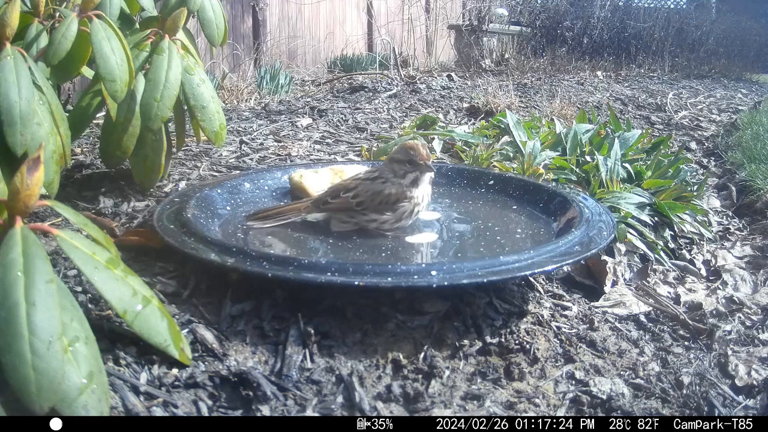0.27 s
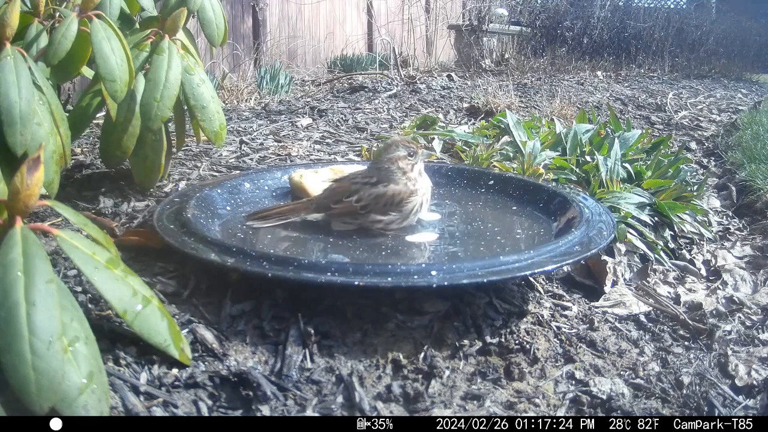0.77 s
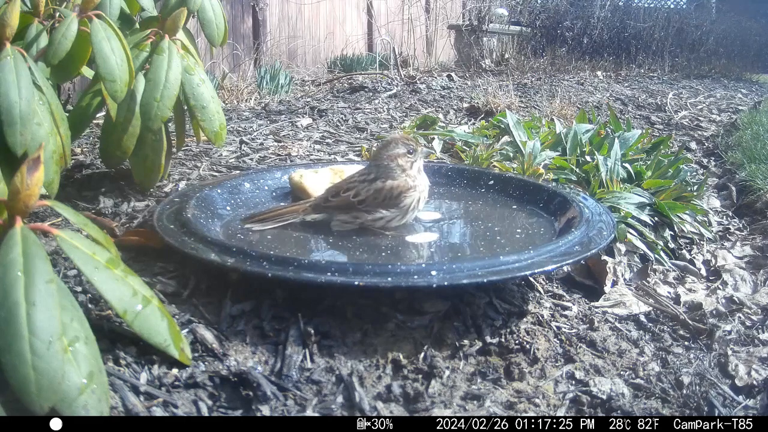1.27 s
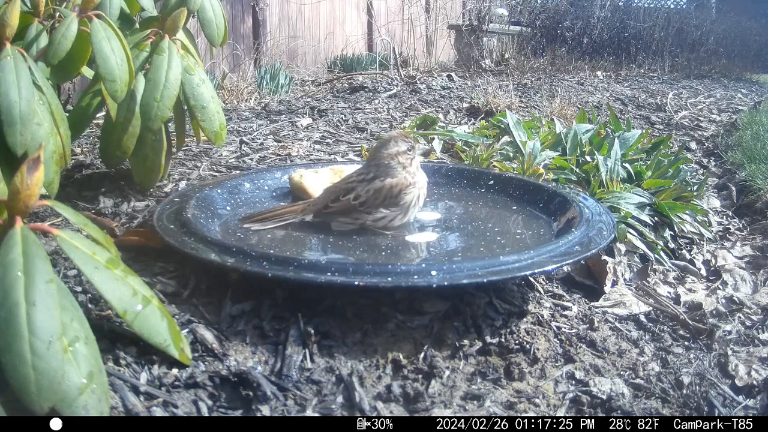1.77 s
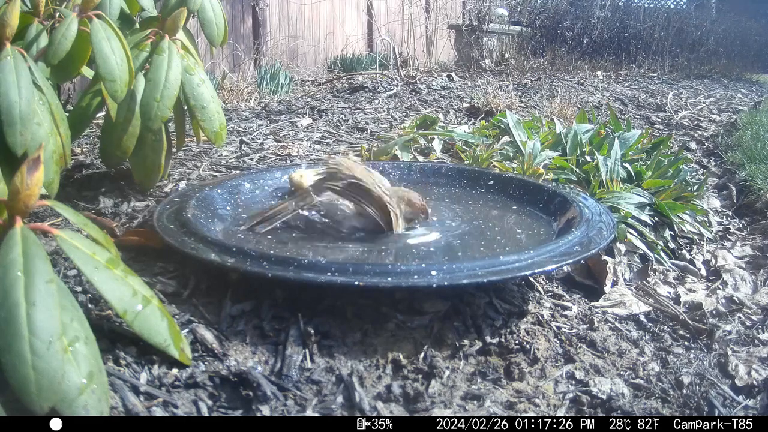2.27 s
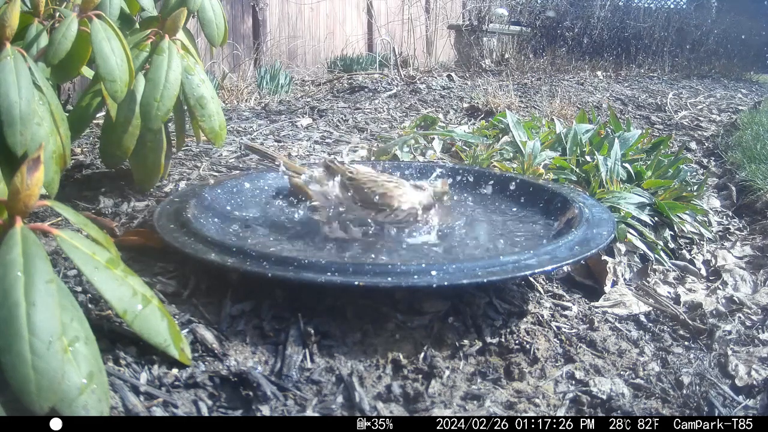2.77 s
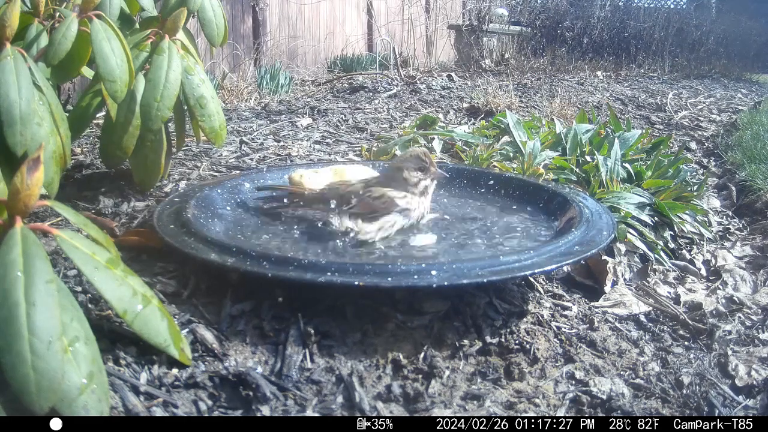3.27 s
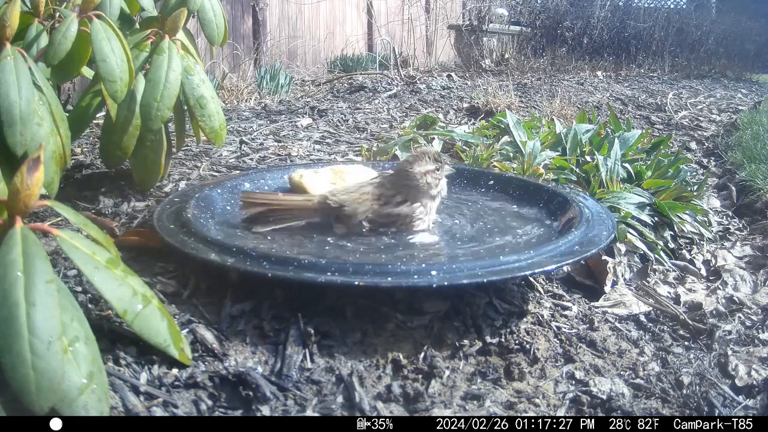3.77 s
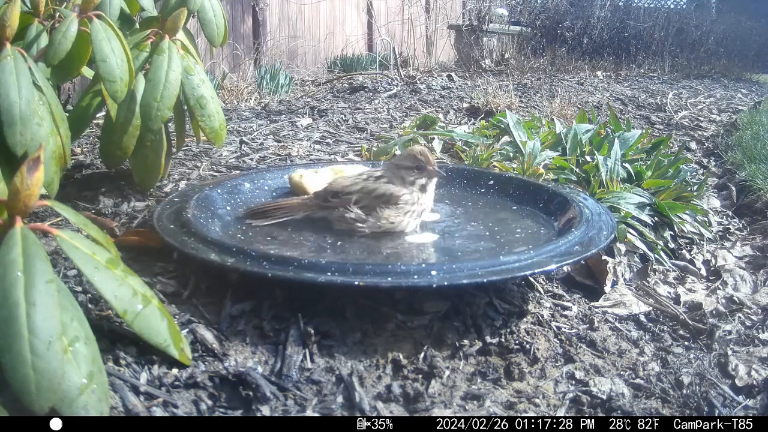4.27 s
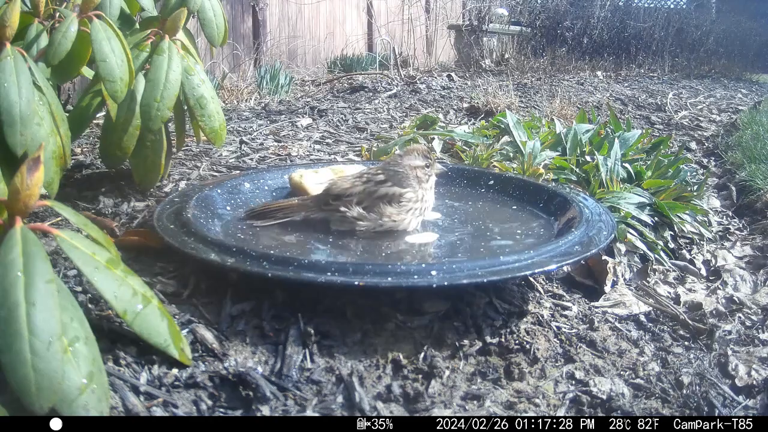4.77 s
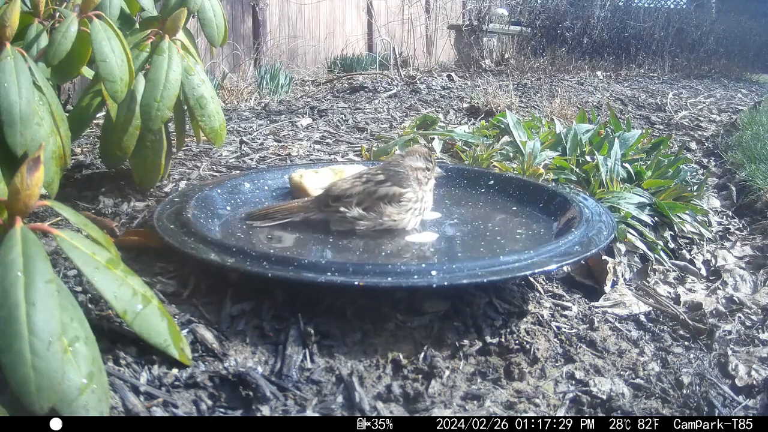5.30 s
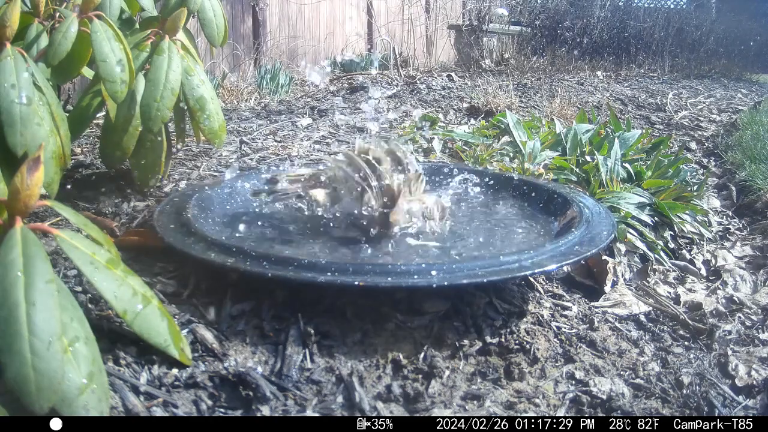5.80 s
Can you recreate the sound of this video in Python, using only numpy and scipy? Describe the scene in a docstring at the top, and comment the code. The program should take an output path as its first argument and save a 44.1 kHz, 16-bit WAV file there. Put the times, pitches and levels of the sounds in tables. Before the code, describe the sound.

A faint, distant low rumble and steady microphone hiss run throughout in a quiet backyard. At about 1.4 seconds a small bird gives one short, nasal, slightly raspy chirp close by. From 2.4 seconds it bathes in a shallow dish, wet wings whirring through the water in quick bouts. Flung drops patter down, a few knock on the microphone's plastic case around 2.6 seconds, and tiny bubbles plink. Between 3 and 4 seconds the splashing brings sharp little slaps and a soft flutter of air, with a second chirp at about 3.8 seconds. The water settles by 4.2 seconds. The lull holds very soft, dull far-off puffs and one thin, faint whistle from a distant bird near 4.7 seconds. At 5.7 seconds a last burst of splashing starts, with more drops knocking on plastic and a bright bubble plink at about 6 seconds.

```python
"""A sparrow bathes in a shallow backyard dish, its wet wings whirring through the water in short bouts.
Wing tips and drops slap the surface, trapped bubbles ring, and flung drops patter about and knock on
the plastic case of a small camera on the ground. Two nasal chirps sound close by, and a far bird
whistles one thin call with both sides of its syrinx. Underneath lies a bed of distant rumble,
soft far-off puffs and microphone hiss."""
import sys
import numpy as np
from scipy import signal
from scipy.fft import rfft, irfft
from scipy.io import wavfile
from scipy.ndimage import uniform_filter1d

SR = 44100
rng = np.random.default_rng(int(sys.argv[2]) if len(sys.argv) > 2 else 0)


def wrap_up_sound(samples):
    """Save the sound to the file named by the first command line argument, as 16-bit audio."""
    columns = np.atleast_2d(samples).T
    # keep every value between -1 and 1, then stretch to whole-number steps
    tamed = np.clip(columns, -1, 1)
    steps = np.round(tamed * 32767).astype(np.int16)
    wavfile.write(sys.argv[1], SR, steps)


N = 266452
TIME = np.arange(N) / SR


def amp(db):
    """Decibels to gain."""
    return 10 ** (np.asarray(db) / 20)


def unit(x):
    """Normalises to rms 1."""
    return x / np.sqrt(np.mean(x ** 2) + 1e-20)


def eq_gain(curve, hz):
    """Gain of an EQ curve at hz, read on a log-frequency axis."""
    f, db = np.transpose(curve)
    return amp(np.interp(np.log(hz + 1), np.log(f), db))


def follow(curve, t):
    """Value of an automation curve at the times t."""
    return np.interp(t, *np.transpose(curve))


def add(mix, s, sound):
    """Mixes a sound in at time s."""
    part = mix[max(round(s * SR), 0):][:len(sound)]
    part += sound[:len(part)]


def colour(x, curve, size=2048):
    """Minimum-phase EQ, its impulse response scaled to energy 1."""
    log_gain = np.log(eq_gain(curve, abs(np.fft.fftfreq(size, 1 / SR))))
    taps = np.fft.ifft(np.exp(np.conj(signal.hilbert(log_gain)))).real
    return signal.oaconvolve(x, taps / np.linalg.norm(taps))[:len(x)]


def noise(curve):
    """Steady noise shaped by an EQ curve, rms 1."""
    spectrum = rfft(rng.standard_normal(N)) * eq_gain(curve, np.fft.rfftfreq(N, 1 / SR))
    return unit(irfft(spectrum, N))


def split(x, hz, order=2):
    """Crossover: the bands below and above hz."""
    low = signal.sosfiltfilt(signal.butter(order, hz, fs=SR, output="sos"), x)
    return low, x - low


def patter(per_s, spread_db):
    """Random clicks, many small and a few large, rms 1."""
    size = amp(spread_db * np.minimum(rng.exponential(1, N), np.pi)) * rng.choice([-1, 1], N)
    return unit(size * (rng.random(N) < per_s / SR))


def wobble(size):
    """Smoothed random modulation, rms 1."""
    return unit(uniform_filter1d(rng.standard_normal(size), size=60))


# EQ of the distant rumble: f/Hz, gain/dB
RUMBLE_EQ = [(15, -12), (55, -8.5), (75, -1), (92, 2.5), (118, -8), (155, -6), (240, -12.5), (320, -17.5),
             (500, -28), (900, -35), (5000, -67)]
# fader ride on its deep drone: t/s, level/dB
DRONE_RIDE = [(0.07, -54.5), (0.6, -56), (0.65, -49.5), (1.88, -55), (1.96, -49), (2.46, -58.5),
              (2.51, -52), (5.59, -54), (6.04, -52.5)]

def rumble(roar_db=-57.0):
    """Distant low rumble: a deep drone swells under a steady, softer roar."""
    drone, roar = split(noise(RUMBLE_EQ), hz=124.0, order=6)
    power = uniform_filter1d(unit(drone) ** 2, size=5000)
    compressed = unit(drone / power ** .4)
    return amp(follow(DRONE_RIDE, TIME)) * compressed + amp(roar_db) * unit(roar)


# EQ of the microphone's noise floor: f/Hz, gain/dB
HISS_EQ = [(1600, 1), (3000, -0.5), (5000, -1.5), (9500, 0), (11000, -2.5), (15000, -2), (16000, -17)]

def hiss(db=-66.0):
    """The microphone's own steady, nearly white noise."""
    return amp(db) * noise(HISS_EQ)


# resonances of the near bird's throat: f/Hz, gain/dB
THROAT_EQ = [(900, -14), (1850, 1), (2700, -3.5), (3600, 7.5), (4000, -5.5), (4600, -19), (7000, -10.5),
             (8000, -33)]
# chirp cues: t/s, length/s, top pitch/Hz, level/dB, roughness/0-1
CHIRP_CUES = [(1.429, .062, 1886, -41.5, 0.83), (3.847, .052, 1920, -39.5, .6)]

def chirp(length, top_hz, db, roughness, rise_s=.031, arch_s=.051, scoop_s=.00817, bright_s=.045):
    """A nasal note scoops up into an arch of pitch and level, breaking into a rasp near the top."""
    t = np.arange(0, length, 1 / SR)
    droop = ((t - rise_s) / arch_s) ** 2  # 0 at the top of the arch, 1 where the pitch would halve
    scoop = np.exp(-(t / scoop_s) ** 2)  # the attack starts flat and weak
    rough = roughness * np.exp(-((t - .033) / .016) ** 2)  # the voice breaks up around 33 ms
    hz = top_hz * (1 - .182 * scoop + .031 * rough * wobble(len(t))) / (1 + droop)
    cycles, voice = np.cumsum(hz) / SR, np.zeros(len(t))
    rasp = .45 * rough
    for k in np.arange(1, 11) / 2:  # five harmonics, with rough half-order partials between
        a, b = (unit(uniform_filter1d(wobble(len(t)), size=45)) for _ in range(2))
        flutter = (1 + rasp * (a + 1j * b)) / np.hypot(1, rasp)  # shakes level and phase
        gain = eq_gain(THROAT_EQ, k * hz) * (amp(-1) * rough if k % 1 else 1)
        if k * top_hz > 4200:  # the top overtones die away as the note goes on
            gain *= np.exp(-t / bright_s)
        voice += gain * (flutter * np.exp(2j * np.pi * k * cycles)).real
    return amp(db - 37 * droop - 6 * scoop) * unit(voice) * signal.windows.tukey(len(t), .1)


# far-off puff cues: t/s, level/dB
PUFF_CUES = [(1.52, -67.5), (2.0, -68), (4.3, -64), (4.76, -63.5), (5.23, -66)]
# dull tone of a puff: f/Hz, gain/dB
PUFF_EQ = [(80, -4), (250, 3), (700, 0), (1400, -7.5), (4000, -31)]

def puffs(half_length_s=0.036):
    """Soft, dull puffs, blurred by distance."""
    envelope = sum(amp(db) / np.hypot(1, ((TIME - s) / half_length_s) ** 2) for s, db in PUFF_CUES)
    return noise(PUFF_EQ) * envelope


# tone of splashing water: f/Hz, gain/dB
SPLASH_EQ = [(120, -13), (300, 1.5), (700, 3.5), (1300, 3.5), (2100, -7), (3700, -2.5), (4300, -12.5),
             (10000, -9), (13000, -9), (16000, -21.5)]
# bouts of wing beats, slower and longer-stroked when the bird lies deep in the water:
# first stroke/s, last stroke/s, rough beat rate/Hz, level/dB, mid-bout offset/dB,
# stroke half length/s, falling drops/dB, fanned air/dB
WING_BOUTS = [(2.403, 2.466, 15, -58, 0, .0056, -66.5, -74), (2.538, 2.8, 19, -55, 7.5, 0.0062, -63, -71),
              (2.86, 2.954, 12, -61.5, 0, 0.0073, -67, -68),
              (3.048, 3.318, 22, -51.5, -1.5, 0.0036, -66.5, -59),
              (3.606, 3.915, 22, -51.5, 3.5, 0.0035, -64, -55),
              (5.72, 5.993, 19, -53, 1, 0.0055, -59.5, -52.5)]

def wings(long_stroke_s=0.0054):
    """Wet feathers tear the water into tiny clicks; longer strokes throw more fine spray."""
    body, spray = split(colour(patter(per_s=9000, spread_db=5), SPLASH_EQ), hz=4030)
    out = np.zeros(N)
    for first, last, rate, db, mid_db, half_length, _, _ in WING_BOUTS:
        water = body + half_length / long_stroke_s * spray
        for progress in np.linspace(0, 1, round((last - first) * rate) + 1):
            s = first + progress * (last - first)
            gain = amp(db + mid_db * np.sin(np.pi * progress) ** 2)
            stroke = abs(TIME - s) < 6 * half_length
            out[stroke] += gain * water[stroke] / np.cosh((TIME[stroke] - s) / half_length)
    return out


def bout_envelope(first, last, attack_s=0.094, release_s=0.16):
    """Builds up before a bout, holds while the wings beat, then dies away."""
    return np.exp(-np.maximum(first - TIME, 0) / attack_s - np.maximum(TIME - last, 0) / release_s)


def draught(band_hz=(115, 220)):
    """The beating wings fan a soft, low flutter of air."""
    bandpass = signal.butter(2, band_hz, "band", fs=SR, output="sos")
    air = unit(signal.sosfilt(bandpass, rng.standard_normal(N)))
    envelopes = [amp(db) * bout_envelope(first, last) for first, last, *_, db in WING_BOUTS]
    return air * np.max(envelopes, axis=0)


# tone of fine spray landing: f/Hz, gain/dB
SPRAY_EQ = [(300, -12), (800, 9), (3500, -2), (4600, -7), (13000, -13), (16000, -10)]

def drizzle(pitches=24, ring_cycles=6):
    """Fine drops fall back around each bout: dry ticks and tiny pitched plinks."""
    t, plinks = np.arange(512) / SR, np.zeros(N)
    for hz in np.geomspace(2500, 13000, pitches) * rng.uniform(0.936, 1.05, pitches):
        plink = np.exp(-t * hz / ring_cycles) * np.sin(2 * np.pi * hz * t)
        plinks += unit(signal.oaconvolve(patter(per_s=10, spread_db=6.0), plink)[:N])
    ticks = colour(patter(per_s=1400, spread_db=5.5), SPRAY_EQ)
    envelopes = [amp(db) * bout_envelope(first, last) for first, last, *_, db, _ in WING_BOUTS]
    return np.max(envelopes, axis=0) * (0.62 * ticks + 0.48 * unit(plinks))


# drops hitting the camera's case: t/s, ring/dB, splat/dB
KNOCK_CUES = [(2.554, -46.5, -50), (2.6153, -45.5, -48.5), (2.67, -37, -41.5), (2.789, -67, -49.5),
              (5.6906, -52, -52), (5.799, -52, -46.5), (5.857, -40, -44.5), (5.97, -54, -54)]
# modes of the plastic case: f/Hz, relative level/dB, t60/s
CASE_MODES = [(653, -3.5, 0.12), (925, -3.5, 0.11), (1157, -5.5, 0.093), (1263, -4.5, 0.11),
              (1440, -7.5, 0.13), (1540, -4.5, 0.12), (1724, -6, .08), (2140, -11, 0.076),
              (3060, -28, 0.043), (3280, -9.5, 0.053), (3580, -23, 0.03), (5470, -13, 0.06)]
# tone of a drop bursting on plastic: f/Hz, gain/dB
SPLAT_EQ = [(300, -20), (700, 1.5), (1600, -2), (2400, 3), (3400, 0), (4400, -2.5), (5600, 1), (7500, -8),
            (16000, -54)]

def knocks(splat_s=0.0081, size=8192):
    """A drop bursts on the case and rings its modes, with fresh phases on every hit."""
    out, t = np.zeros(N), np.arange(size) / SR
    hz, mode_db, t60 = np.transpose(CASE_MODES)[:, :, None]
    weight = amp(mode_db)
    decays = weight * np.exp(-np.log(1000) * t / t60) / np.sqrt((weight ** 2).sum() / 2)
    for s, ring_db, splat_db in KNOCK_CUES:
        ring = (decays * np.sin(2 * np.pi * (hz * t + rng.random(hz.shape)))).sum(0)
        splat = colour(rng.choice([-1, 1], size) * np.exp(-t / splat_s), SPLAT_EQ)
        add(out, s, amp(ring_db) * ring + amp(splat_db) * splat)
    return out


# the larger bubbles left by drops: t/s, peak level/dB, f/Hz
BUBBLE_CUES = [(2.735, -45.5, 5080), (2.769, -52, 4400), (2.790, -41, 3210), (5.985, -45.5, 2430),
               (6.0156, -31, 2450)]

def bubbles(life_cycles=9):
    """A trapped bubble rings for a few milliseconds and bursts; small, high ones go sooner."""
    out, t = np.zeros(N), np.arange(2048) / SR
    for s, db, hz in BUBBLE_CUES:
        add(out, s, amp(db) * np.exp(-(t * hz / life_cycles) ** 3) * np.sin(2 * np.pi * hz * t))
    return out


# hard hits of a wing tip or drop on the water: t/s, crack/dB, swish/dB, treble shelf on both/dB
SLAP_CUES = [(3.0924, -33, -46, -4), (3.0997, -33, -44, 1), (3.141, -33.5, -42, -1.5),
             (3.1854, -31.5, -57, -4.5), (3.228, -40, -41.5, 3), (3.323, -40, -40, 1.5),
             (3.3757, -38, -51, -0.5), (3.604, -45, -42, -17), (3.6934, -41, -62, 0),
             (3.9203, -35.5, -41.5, -5.5), (3.9726, -44, -47.5, 8.5), (4.1886, -40, -56.5, 8.5),
             (5.7798, -40.5, -48, 4)]

def slaps(fizz_s=0.00048, swish_s=0.0013, lead_s=0.00096):
    """A brief swish of water leads into a crack: one sharp push with a very short tail of fizz."""
    out, t = np.zeros(N), np.arange(-1024, 1024) / SR
    for s, crack_db, swish_db, treble_db in SLAP_CUES:
        fizz = 0.98 * rng.standard_normal(len(t)) * np.exp(-abs(t) / fizz_s) * (t >= 0)
        crack = colour((t == 0) + fizz, SPLASH_EQ)
        body, mist = split(colour(rng.standard_normal(len(t)), SPLASH_EQ), hz=4400)
        swish = (body + 0.19 * mist) / np.cosh((t + lead_s) / swish_s)
        slap = amp(crack_db) * crack / abs(crack).max() + amp(swish_db) * swish
        low, high = split(slap, hz=2000, order=1)
        add(out, s + t[0], low + amp(treble_db) * high)
    return out


# pitch glides of the far call, one curve for each side of the syrinx: t/s, f/Hz
SYRINX_GLIDES = [
    [(4.675, 3400), (4.702, 2750), (4.725, 3060), (4.750, 4020), (4.757, 4800), (4.772, 3200)],
    [(4.708, 2890), (4.722, 3580), (4.738, 3910), (4.754, 5320), (4.772, 4670), (4.788, 4540)],
]

def whistle(glide, peak_s=4.752, peak_db=-54.5, rise_db_per_s=240, fall_db_per_s=380):
    """One side of a far bird's syrinx: a gliding, slightly unsteady sine that swells and fades."""
    t = np.arange(glide[0][0], glide[-1][0], 1 / SR)
    hz = follow(glide, t) * (1 + 0.0081 * wobble(len(t)))
    db = peak_db - np.maximum(rise_db_per_s * (peak_s - t), fall_db_per_s * (t - peak_s))
    return amp(db) * np.sin(2 * np.pi * np.cumsum(hz) / SR) * signal.windows.tukey(len(t), .1)


def yard(send, t60=0.079, predelay_s=.003, echoes_per_s=2000, size=12000):
    """Short outdoor reverb: scatter from leaves, ground and fence."""
    t = np.arange(size) / SR
    echoes = rng.standard_normal(size) * (rng.random(size) < echoes_per_s / SR)
    taps = echoes * (t > predelay_s) * np.exp(-np.log(1000) * t / t60)
    return signal.oaconvolve(send, taps / np.linalg.norm(taps))[:N]


def scene():
    """Mono mix: water and birds feed the yard reverb; knocks, draught and the bed stay dry."""
    bed = rumble() + hiss() + puffs()
    near_bird, far_bird = np.zeros((2, N))
    for s, *note in CHIRP_CUES:
        add(near_bird, s, chirp(*note))
    water = wings() + drizzle() + bubbles() + slaps()
    for glide in SYRINX_GLIDES:
        add(far_bird, glide[0][0], whistle(glide))
    reverb = yard(amp(-10.5) * water + amp(-18) * near_bird + amp(-7) * far_bird)
    return (bed + near_bird + water + draught() + knocks() + far_bird + reverb)[None]


def record(dry, cutoff_hz=15750):
    """The camera's band limit: a steep high cut."""
    lowpass = signal.firwin(511, cutoff_hz, window=("kaiser", 9), fs=SR)
    return signal.oaconvolve(dry, lowpass[None], "same")


dry = scene()
out = record(dry)
wrap_up_sound(out)
```